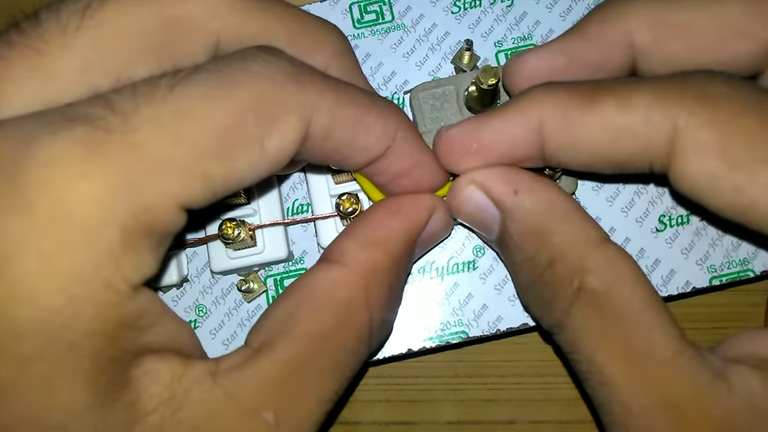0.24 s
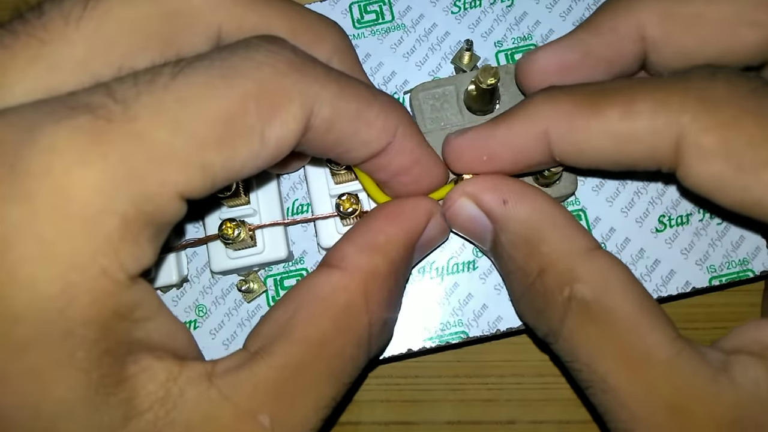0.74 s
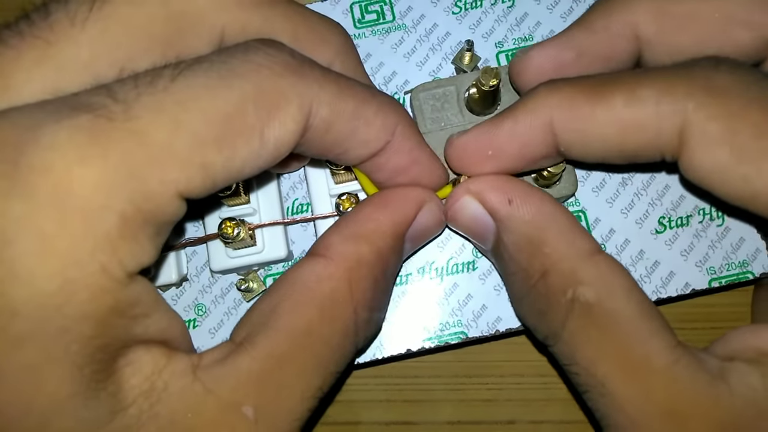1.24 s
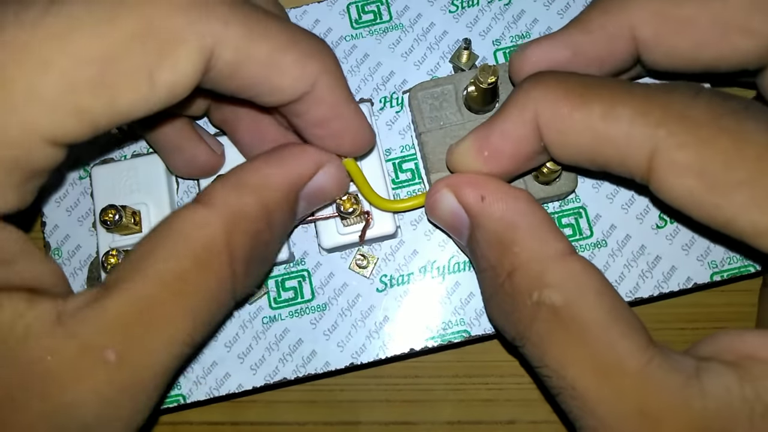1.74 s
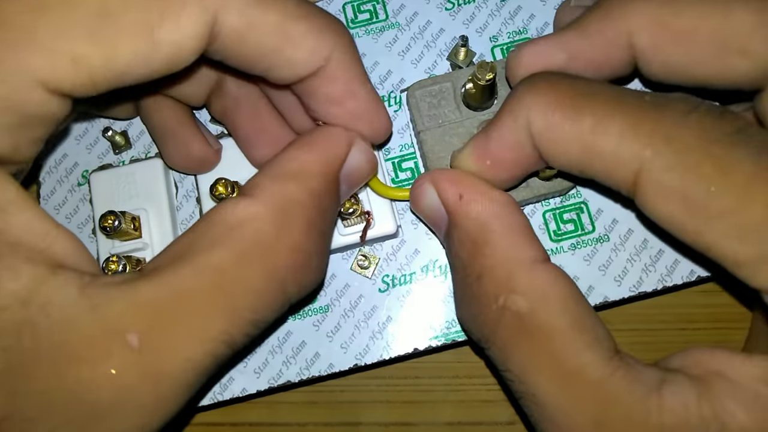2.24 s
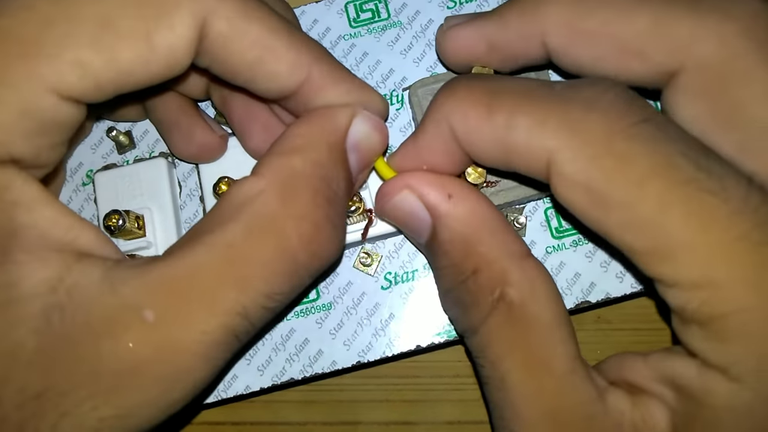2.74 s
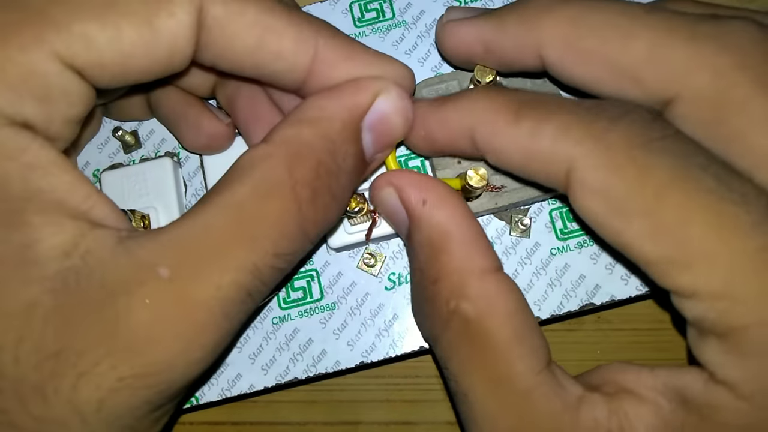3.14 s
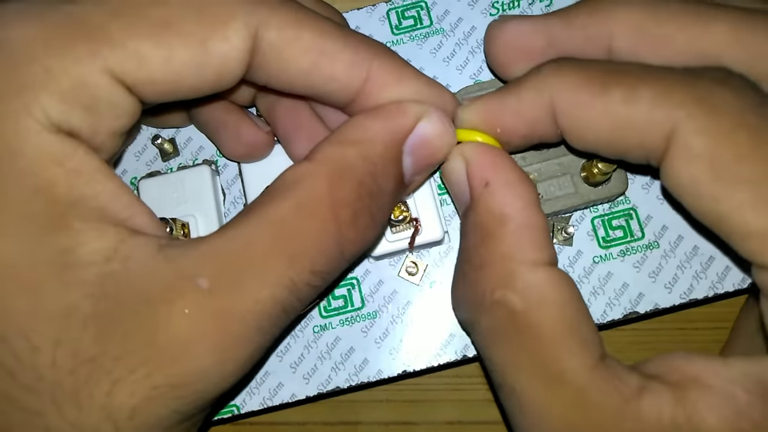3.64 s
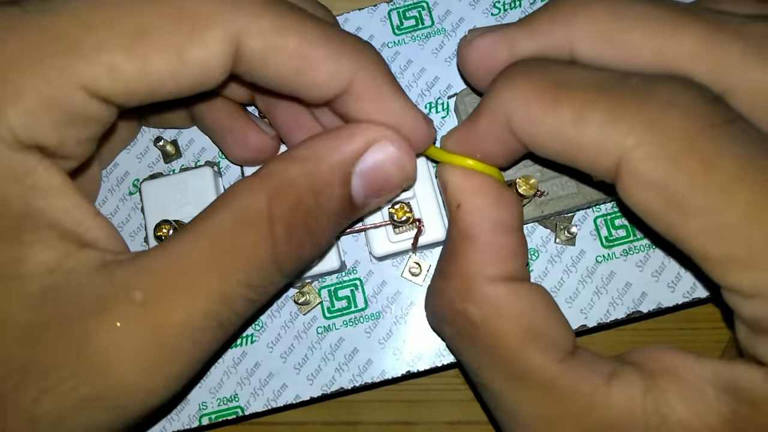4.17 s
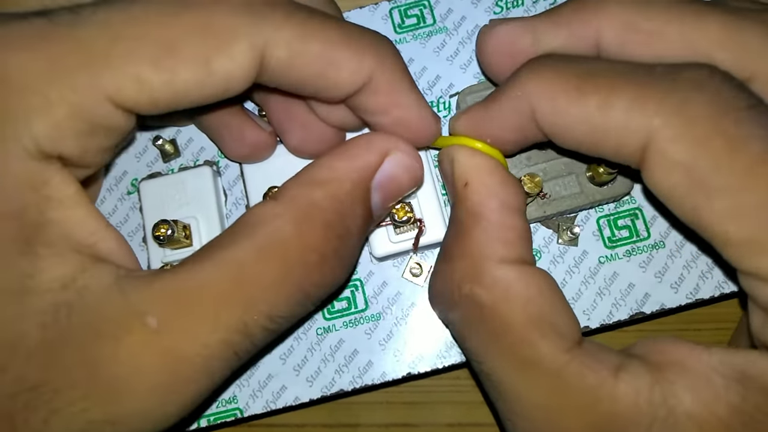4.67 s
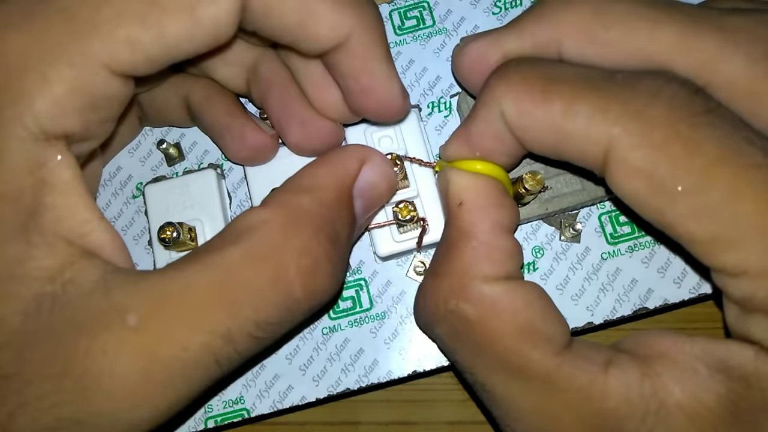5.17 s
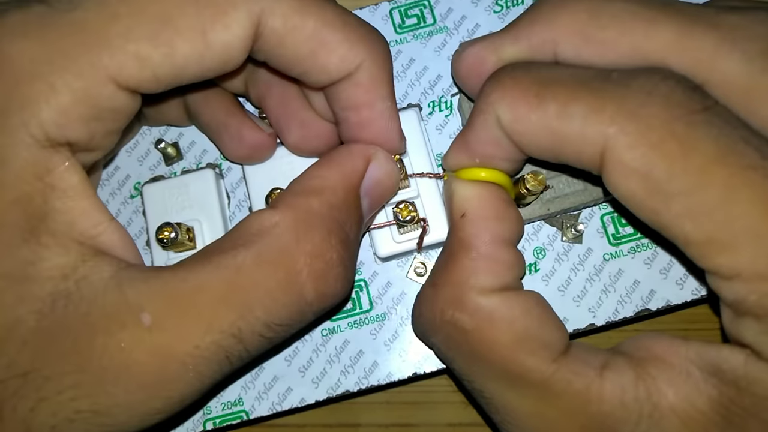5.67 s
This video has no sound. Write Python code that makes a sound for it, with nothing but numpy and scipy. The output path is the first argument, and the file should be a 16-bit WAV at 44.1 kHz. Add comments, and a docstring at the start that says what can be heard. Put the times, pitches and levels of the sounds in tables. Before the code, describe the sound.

Fingers work a stiff wire into brass screw terminals, close to a mono microphone. For the first 1.2 seconds, thin metallic ticks and hard plastic clacks come in quick, uneven clusters, with soft, grainy fingertip rubbing and light knocks of the board on a table. After a brief lull, a sharp tick stands out at about 1.9 seconds. More clicks follow, with the strongest dull knock near 2.5 seconds and a low rumble as the hands lean on the board. At about 3.6 seconds the wire end springs free with a small, bright snap. Slightly hollower ticks continue, with a sharp one near 4.2 seconds and a last cluster from 5 to 5.5 seconds, then a couple of faint ones as the knocks fade. The small bare room rings briefly after each sound, over a faint low hum.

```python
"""Fingertips rub close to the microphone while a stiff wire ticks against brass.
Fingers bend it into the screw terminals of a laminate switchboard, socket first, then switch. Skin
sticks and slips, each slip of the wire rings the brass, and the board rumbles and knocks on its table.
Once the wire end springs free with a snap. The place is a small bare room, heard in mono: its walls
ring after every sound, over a faint low hum."""
import sys
import numpy as np
from scipy import signal
from scipy.fft import rfft, irfft
from scipy.io import wavfile
from scipy.ndimage import uniform_filter1d

SR = 44100
rng = np.random.default_rng(int(sys.argv[2]) if len(sys.argv) > 2 else 0)


def wav_out(sig):
    """Save sig, one row per channel (or a flat mono array), as 16-bit PCM at SR to the path in sys.argv[1]."""
    wavfile.write(sys.argv[1], SR, np.round(np.clip(np.atleast_2d(sig).T, -1, 1) * 32767).astype(np.int16))


N = 260631

# fingertips on wire and plastic: (time [s], length [s], relative level [dB], centre [Hz], width [octaves])
RUBS = [(0, 0.058, -50, 770, 4.3), (0.681, 0.22, -55.5, 1050, 2), (1.004, 0.39, -64, 1470, 2.5),
        (1.191, 0.1, -59, 1170, 1.9), (1.498, 0.069, -56.5, 750, 0.48), (1.51, .028, -57.5, 3350, 2.3),
        (2.17, 0.071, -44, 7900, 0.81), (2.377, 0.17, -59.5, 880, 0.73), (2.527, 0.12, -53, 805, 0.84),
        (2.559, 0.31, -52, 1360, 2.33), (2.882, 0.18, -61, 603, 2.3), (3.02, 0.06, -55, 9500, .6),
        (3.08, 0.11, -55, 400, 0.77), (3.081, 0.31, -57.5, 1600, 2.8), (3.268, 0.27, -61.5, 7740, 0.76),
        (3.36, 0.39, -52.5, 1100, 3.3), (3.489, 0.07, -48, 4700, 3.2), (3.836, 0.193, -56, 1093, 0.77),
        (4.005, 0.24, -65, 1437, 2.16), (4.358, 0.0397, -56.5, 930, 1.2), (4.38, 0.058, -58.5, 592, 2),
        (4.696, 0.025, -62.5, 1260, 0.52), (4.977, 0.058, -73, 1040, 0.56), (5.043, 0.047, -53, 1150, 0.91),
        (5.159, 0.14, -66.5, 1870, 1.1), (5.312, 0.16, -53, 6550, 1.1), (5.64, 0.088, -59.5, 958, 0.18),
        (5.841, 0.039, -60, 230, 0.68)]
# wire and brass in plastic: (frequency [Hz], width [Hz], gain at socket [dB], gain at switch [dB])
BRASS_MODES = [(810, 99, 10, -20.5), (1046, 50, 5.5, 3.5), (1440, 420, 2.5, 1.5), (1998, 76, -8, -4),
               (2357, 225, -7, 0.5), (2994, 450, -8, -17), (3636, 24, -30, -3), (4250, 130, -2.5, -7.5),
               (4570, 53, -10.5, -4), (5380, 1030, 0, -2.5), (6230, 550, 2.5, -4.5), (7160, 870, 12.5, 6.5),
               (8590, 200, 6.5, 2), (9140, 330, 0, 0), (9770, 67, -18, 4), (10760, 300, 3, -3),
               (12160, 480, 1.5, -17.5), (12100, 170, -7.5, -18), (14600, 500, 0.5, -10)]
# laminate board on the table: (frequency [Hz], width [Hz], gain [dB])
BOARD_MODES = [(107, 14, 3.5), (162, 51, 4), (217.3, 23, -1.5), (353, 120, 0), (449, 94, 3),
               (561.4, 56, 8.5), (707, 93, 5), (824, 17, 8.5), (1040, 90, -21), (1354, 140, -6.5)]
# hands shifting their weight on the board: (time [s], relative level [dB])
LEANING = [(0, -58), (.25, -58), (.38, -51), (.72, -63), (.97, -51), (1.33, -61), (1.51, -58),
           (1.81, -55.5), (1.92, -54), (2.29, -51), (2.6, -46.5), (3.42, -54.5), (3.8, -59.5),
           (4.07, -51.5), (4.229, -60), (4.9, -71), (5.6, -62.5), (5.91, -90)]
# room tone: (frequency [Hz], relative spectral level [dB])
AIR_SPECTRUM = [(25, -20), (70, 7.5), (180, -6.5), (350, -3.5), (700, -18), (3500, -47.5), (9000, -22),
                (14000, -17.5), (16000, -29)]
# diffuse ring of the walls: (frequency [Hz], gain [dB], t60 [s])
ROOM_RING = [(100, -18.5, 0.94), (260, 1.5, 0.87), (566, -2.5, 0.49), (1490, -4.5, 0.48),
             (3130, -0.5, 0.59), (5400, -2.5, 0.66), (7500, -6.5, 0.65), (10500, -7, 0.48),
             (15000, -10, 0.75)]
# standing waves of the room: (frequency [Hz], relative gain [dB], t60 [s])
ROOM_MODES = [(59, -19, 0.82), (80, -2.5, 0.31), (83.5, 3.5, 0.36), (110.7, 7, 0.64), (130, -31.5, 0.9),
              (151.7, 3, 0.46), (179.6, -13.5, 0.44), (214.2, -6, 0.48), (360.6, -2, 0.58),
              (383, -5.5, 0.57), (407, 2.5, 0.97), (527, -3, 0.13), (710, -20.5, 0.25), (883, -14, 0.23),
              (1855, -13.5, 0.26)]
# bands of a click: (edge [Hz])
CLICK_BANDS_HZ = [700, 1900, 4500, 8500, 15500]
# what the wire strikes: (relative level in each click band [dB])
SCREW = [-2, 0.5, 2.5, -4]  # brass screw of the socket: a thin, even tick
SOCKET = [-5.5, 2, 0.5, -10.5]  # plastic body of the socket: a hard clack
SWITCH = [-4, -1.5, 2, -4.5]  # terminal of the switch: a hollow tick
# wire slipping and striking: (time [s], length [ms], level [dB], brightness [dB/octave], part struck)
CLICKS = [(0.0373, 18, -40, -5.5, SCREW), (0.1797, 1.8, -50.5, 11, SCREW), (0.2378, 3, -30.5, 2, SCREW),
          (.2765, 2.8, -35, -2.5, SCREW), (.412, 2.4, -41, -5, SCREW), (0.424, 2.6, -32, 1, SOCKET),
          (0.4346, 1.4, -39, 6, SCREW), (.441, 2.4, -33, 2, SCREW), (0.5378, 4.2, -33.5, -1, SOCKET),
          (.5586, 5.9, -39, 16, SCREW), (0.6267, 0.75, -38.5, 2.5, SCREW),
          (0.6713, 3.4, -35.5, -0.5, SCREW), (.6883, 2.3, -44.5, 0, SOCKET),
          (0.754, 4.3, -38.5, -9, SOCKET), (.9003, 2.6, -32, -1, SOCKET), (0.908, 2, -42, -1.5, SCREW),
          (0.9326, 1.6, -41.5, -10, SOCKET), (0.9804, 2.7, -29.5, 2, SOCKET),
          (1.0001, 1.8, -34.5, -6, SOCKET), (1.007, 5.6, -29.5, 2, SCREW), (1.1597, 5.5, -39, -4.5, SCREW),
          (1.1723, 2.3, -47.5, -7, SOCKET), (1.467, 4, -65.5, 8.5, SOCKET), (1.518, 7.2, -51, -7.5, SOCKET),
          (1.741, 5, -36, 3, SCREW), (1.8569, 1.56, -25, 5.5, SCREW), (2.1572, 9.2, -54, -3.5, SOCKET),
          (2.1795, 7.5, -36, 3.5, SCREW), (2.1928, 4.4, -53.5, -9.5, SCREW), (2.213, 1.5, -42, 4.5, SCREW),
          (2.231, 4.6, -39.5, 3, SCREW), (2.4583, 6.1, -45.5, -5.5, SCREW), (2.4672, 1.5, -40, 1.5, SCREW),
          (2.4887, 3.4, -27.5, -1, SOCKET), (2.4997, 1.5, -39.5, 15, SCREW), (2.529, 5.3, -34, 7.5, SCREW),
          (2.582, 2.3, -39, 1, SOCKET), (2.589, 3.7, -32, 3, SCREW), (2.82, 5.4, -45, -1, SCREW),
          (2.846, 2.3, -49.5, 7, SCREW), (3.0951, 9.2, -46, -1, SWITCH), (3.1222, 3.4, -35.5, -1.5, SWITCH),
          (3.3782, 5.8, -44, -2.5, SWITCH), (3.516, 3.7, -41, 6, SWITCH),
          (3.5357, 1.3, -36.5, -2.5, SWITCH), (3.5716, 5.8, -34.5, 5, SWITCH),
          (3.5783, 0.88, -24, 4, SWITCH), (3.6495, 4.4, -39, -6, SWITCH), (3.7003, 0.95, -42, -2.5, SWITCH),
          (3.85, 3.5, -39.5, -10, SWITCH), (3.867, 3.9, -40, -6, SWITCH), (4.1279, 6.8, -42.5, 1, SWITCH),
          (4.1426, 2, -47.5, -3, SWITCH), (4.1658, 1.2, -38, 1.5, SWITCH), (4.18, 2.3, -25.5, 7.5, SWITCH),
          (4.4523, 3.3, -47.5, -6.5, SWITCH), (4.5943, 2.5, -36, 3.5, SWITCH),
          (4.9724, 3.6, -56, -11.5, SWITCH), (5.0449, 3, -39.5, 6.5, SWITCH),
          (5.0742, 2.9, -34.5, 4, SWITCH), (5.09, 4.4, -37, 2.5, SWITCH), (5.3277, 5.4, -35, 1.5, SWITCH),
          (5.3891, 1.5, -41, 0, SWITCH), (5.3986, 4.9, -34, 2.5, SWITCH), (5.4499, 4.6, -40.5, 1, SWITCH),
          (5.625, 3, -40, -.5, SWITCH), (5.8418, 3, -41.5, -2, SWITCH)]
# bands of a knock: (edge [Hz])
KNOCK_BANDS_HZ = [60, 220, 550, 1400]
# a knock of middling brightness: (relative level in each knock band [dB])
KNOCK_SHAPE_DB = [-3, -2, -6.5]
# board nudged against the table: (time [s], relative level [dB], brightness [dB/octave])
KNOCKS = [(0.0399, -47, 5), (0.1451, -44, -3), (0.1518, -33, 1.5), (.179, -44, -11), (0.2351, -43, -7.5),
          (.272, -44.5, 2.5), (0.4882, -39.5, -1), (0.508, -40.5, -0.5), (0.5584, -46.5, 4.5),
          (.678, -45.5, 7.5), (0.9089, -51, 4), (0.9297, -43.5, -3), (0.9807, -46, 5), (1.001, -44.5, 3),
          (1.34, -52, -30), (1.5206, -47, -5), (1.7439, -46, -8.5), (1.7779, -45, -5), (1.9027, -38, .5),
          (2.4911, -45, -3.5), (2.525, -28.5, 3.5), (2.583, -38, -3), (2.645, -41, 2), (2.767, -41, -14),
          (2.816, -35, -1), (2.845, -50, -2), (3.344, -45, -1), (3.372, -41, 0), (3.431, -46, 5.5),
          (3.587, -45.5, 5.5), (3.867, -52.5, 8), (3.973, -53, -8), (4.454, -58, -4.5),
          (4.495, -53.5, -22.5), (5.4263, -56.5, -6), (5.6247, -58, 2), (5.841, -67, -5)]
# ring of the freed wire end: (frequency [Hz], twice the width [Hz], relative level [dB])
SNAP_MODES = [(6940, 290, -11), (7350, 400, -19.5), (10920, 160, -8), (11900, 300, -12), (14700, 900, -11)]

AT_SWITCH_S = 3.0  # the wire moves from socket to switch
TOP_HZ = 15700  # upper limit of the microphone chain


def undb(db):
    """Decibels to gain."""
    return 10 ** (np.asarray(db) / 20)


def level(x, db):
    """Set the rms level."""
    return x * undb(db) / np.sqrt(np.mean(x ** 2) + 1e-20)


def contour(size, hz, values):
    """Points joined on a log-frequency axis, one value a spectral bin."""
    return np.interp(np.log(np.fft.rfftfreq(size, 1 / SR) + 1), np.log(hz), values)


def colour(x, hz, db):
    """Filter by a smooth spectrum."""
    return irfft(rfft(x) * undb(contour(len(x), hz, db)), len(x))


def resonate(x, modes):
    """Damped resonances with notches between them: (frequency [Hz], width [Hz], gain [dB])."""
    f = np.fft.rfftfreq(len(x), 1 / SR)
    response = sum(undb(db) * 1j * f * w / (hz ** 2 - f ** 2 + 1j * f * w) for hz, w, db in modes)
    return irfft(rfft(x) * response, len(x))


def band_levels(edges, shape_db, db, brightness):
    """Share a level among bands: the harder the contact, the more goes to the upper ones."""
    octaves = np.log2(np.array(edges[1:]) * np.array(edges[:-1])) / 2
    shares = np.array(shape_db) + brightness * octaves
    return db + shares - 10 * np.log10(np.sum(undb(shares) ** 2))


def balance(x, edges, db, span_s):
    """Give a short sound its level in each band, taken as rms over span_s."""
    edges = np.array(edges, float)
    centres = np.sqrt(edges[1:] * edges[:-1])
    cuts = (edges * len(x) / SR).astype(int)
    for _ in range(2):
        power = np.add.reduceat(np.abs(rfft(x)) ** 2, cuts)[:-1] * 2 / (len(x) * span_s * SR)
        x = colour(x, centres, np.array(db) - 10 * np.log10(power + 1e-20))
    return x


def add(out, s, x):
    """Mix x in from time s."""
    start = min(int(s * SR), N)
    first, last = max(start, 0), min(start + len(x), N)
    out[first:last] += x[first - start:last - start]


def skin_slips(size, per_s, spread_db=-0.5):
    """Skin sticks and lets go: sparse impulses of uneven strength."""
    slipping = rng.random(size) < per_s / SR
    strength = rng.standard_normal(size)
    return slipping * strength * undb(spread_db * np.minimum(rng.exponential(size=size), 4))


def finger_pressure(size, hold_s=0.013, uneven_db=3):
    """A fingertip never presses evenly: a gain that wanders from moment to moment."""
    presses = rng.standard_normal(256)
    moments = np.arange(size) / SR / hold_s
    return undb(uneven_db * np.interp(moments, np.arange(len(presses)), presses))


def gripped_brass(s, detune=0.014, scatter_db=2):
    """The modes under the fingers at time s; every grip favours other modes and shifts them a little."""
    hz, width, socket_db, switch_db = np.transpose(BRASS_MODES)
    shift, favour = rng.standard_normal((len(hz), 2)).T
    db = socket_db if s < AT_SWITCH_S else switch_db
    return zip(hz * (1 + detune * shift), width, db + scatter_db * favour)


def finger_rubs(skin_db=-22, board_db=-8, gain_db=-2):
    """Close up, sliding skin is a run of fine grains that ring the brass and the board."""
    out, longest = np.zeros(N), 16384
    for s, length_s, db, centre_hz, octaves in RUBS:
        size = min(int(length_s * SR), longest)
        # a faster slide is both higher and denser
        slips = skin_slips(longest, per_s=750 * np.sqrt(centre_hz / 970)) * finger_pressure(longest)
        brass = resonate(slips, gripped_brass(s))
        board = undb(board_db) * resonate(slips, BOARD_MODES)
        band_hz = np.minimum(centre_hz * 2 ** (np.array([-.5, .5]) * octaves), TOP_HZ)
        bandpass = signal.butter(3, band_hz, "band", fs=SR, output="sos")
        rub = signal.sosfilt(bandpass, brass + board + undb(skin_db) * slips)
        add(out, s, level(rub[:size] * signal.windows.tukey(size, .35), db))
    return out * undb(gain_db)


def leaning_hands(gain_db=-6):
    """A dull rumble through the board while the hands press on it."""
    rumble = colour(rng.standard_normal(N), hz=[25, 55, 80, 115, 170, 300, 800],
                    db=[-22.5, -4.5, -0.5, -6, -8.5, -26.5, -57])
    weight_db = np.interp(np.arange(N) / SR, *np.transpose(LEANING))
    return level(rumble, gain_db) * undb(weight_db)


def room_tone(air_db=-80, hum_hz=187, hum_db=-82.5):
    """The place itself, behind the handwork: still air and a faint hum."""
    air = colour(rng.standard_normal(N), *np.transpose(AIR_SPECTRUM))
    hum = np.sin(2 * np.pi * hum_hz * np.arange(N) / SR)
    return level(air, air_db) + level(hum, hum_db)


def bare_walls(x, gap_s=0.0013, build_s=0.0064, modes_db=-61):
    """Near walls return each sound to the microphone as a dense ring with low standing waves."""
    t = np.arange(SR) / SR
    hz, db, t60 = np.transpose(ROOM_RING)
    noise, tail = rfft(rng.standard_normal(len(t))), 0
    build = 1 - np.exp(-np.maximum(t - gap_s, 0) / build_s)
    for k in range(len(hz)):
        fade = undb(-60 * t / t60[k]) * build
        band = irfft(noise * contour(len(t), hz, np.eye(len(hz))[k]), len(t))
        tail = tail + undb(db[k]) * band * fade / np.sqrt(np.sum(fade ** 2))
    waves = sum(undb(mode_db - 60 * t / mode_t60) * np.cos(2 * np.pi * mode_hz * t)
                for mode_hz, mode_db, mode_t60 in ROOM_MODES)
    return signal.fftconvolve(x, tail + undb(modes_db) * waves)[:N]


def wire_clicks(crack_db=-17, swell_db=-18, swell_s=0.004, chatter_db=-15, chatter_s=0.012,
                lead_s=0.00067):
    """Each tick swells in briefly, rings the brass in a burst of contacts and chatters to rest."""
    out, t = np.zeros(N), (np.arange(4096) - 512) / SR
    swell = undb(swell_db) * (t <= 0) * np.exp(-np.abs(t) / swell_s)
    chatter = undb(chatter_db) * (t > 0) * np.exp(-np.abs(t) / chatter_s)
    for s, length_ms, db, brightness, part in list(CLICKS) + wire_creeps():
        width_s = np.where(t < 0, .35, .72) * max(length_ms, .5) / 1000  # quick rise, slower fall
        burst = np.exp(-.5 * (t / width_s) ** 2)
        # the chance spacing of the contacts gives each slip a colour of its own
        force = rng.standard_normal(len(t)) * (swell + burst + chatter)
        tick = resonate(force, gripped_brass(s)) + undb(crack_db) * force
        tick = colour(tick, hz=[200, 500, 800, 11500, 15500], db=[-25.5, -7, -9, 11, -4])
        band_db = band_levels(CLICK_BANDS_HZ, part, db, brightness)
        add(out, s + t[0] - lead_s, balance(tick, CLICK_BANDS_HZ, band_db, span_s=.005))
    return out


def rattle(envelope):
    """A burst of tiny contacts under an envelope, its energy spread fairly evenly over frequency."""
    spectrum = rfft(rng.standard_normal(len(envelope)) * envelope)
    contacts = irfft(spectrum / np.sqrt(np.abs(spectrum) + 1e-12), len(envelope))
    local_rms = np.sqrt(np.abs(uniform_filter1d(contacts ** 2, size=64)) + 1e-12)
    return envelope * contacts / local_rms


def board_knocks(push_s=0.0045, thud_db=-16, lead_s=0.0015, gain_db=-1):
    """The board rocks on the table: a short rattling push into its bending modes."""
    out, t = np.zeros(N), (np.arange(8192) - 1024) / SR
    for s, db, brightness in KNOCKS:
        force = rattle((t > 0) * np.exp(-np.abs(t) / push_s))
        body = resonate(force, BOARD_MODES) + undb(thud_db) * force
        # soft fingers pass on little treble
        body = colour(body, hz=[30, 75, 870, 1050, 1600, 2600, 8000],
                      db=[-25, -5, -6, -9.5, -4.5, -17.5, -50.5])
        band_db = band_levels(KNOCK_BANDS_HZ, KNOCK_SHAPE_DB, db, brightness)
        add(out, s + t[0] - lead_s, balance(body, KNOCK_BANDS_HZ, band_db, span_s=.02))
    return out * undb(gain_db)


def wire_creeps(wait_s=0.033, creep_db=-18.5, scatter_db=3):
    """The bent wire creeps on: a weaker slip a random moment after each one; rows as in CLICKS."""
    chance = rng.standard_normal((len(CLICKS), 3))
    return [(s + wait_s * np.hypot(a, b), length_ms / 2, db + creep_db + scatter_db * c, brightness, part)
            for (s, length_ms, db, brightness, part), (a, b, c) in zip(CLICKS, chance)]


def wire_snap(at_s=3.5763, level_db=-24, hold_s=0.0032, damp_s=0.0007, after_db=-14):
    """The freed wire end whips against the terminal and rings until the fingertip damps it."""
    out, t = np.zeros(N), np.arange(441) / SR
    ring = sum(undb(db) * np.exp(-np.pi * w * t / 2) * np.sin(2 * np.pi * hz * t)
               for hz, w, db in SNAP_MODES)
    rise = np.minimum(t / hold_s * 2, 1)
    damping = np.exp(-np.maximum(t - hold_s, 0) / damp_s) + undb(after_db)
    add(out, at_s, level(ring * rise * damping, level_db))
    return out


def scene():
    """The handwork close to one microphone, with the room around it."""
    handwork = wire_clicks() + wire_snap() + board_knocks() + finger_rubs() + leaning_hands()
    return (handwork + bare_walls(handwork) + room_tone())[None]


def record(dry):
    """The microphone chain cuts off steeply above TOP_HZ."""
    return signal.sosfilt(signal.ellip(10, .2, 80, TOP_HZ, fs=SR, output="sos"), dry)


dry = scene()
out = record(dry)
wav_out(out)
```